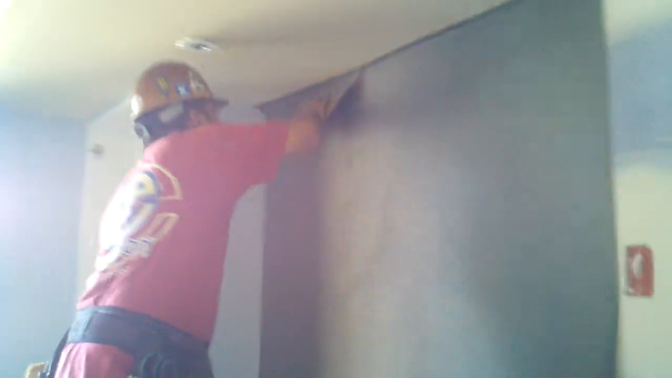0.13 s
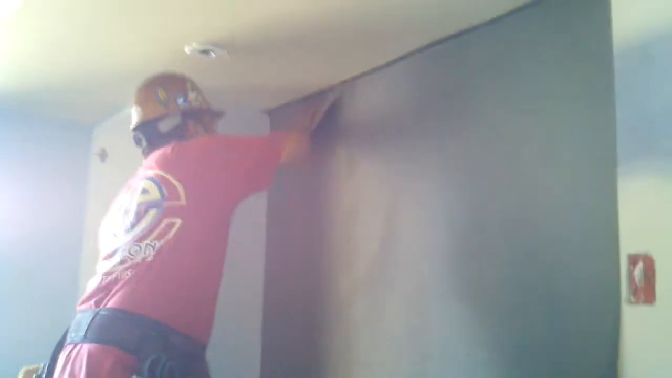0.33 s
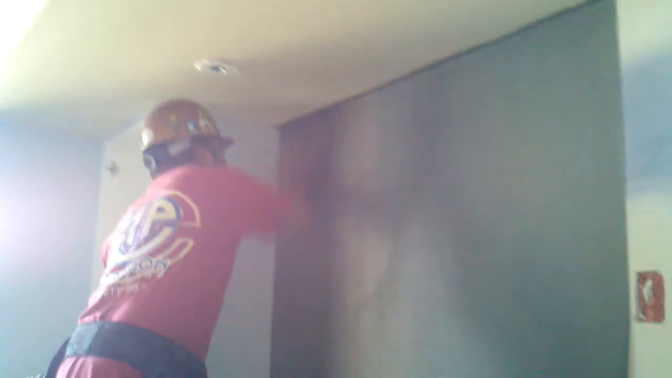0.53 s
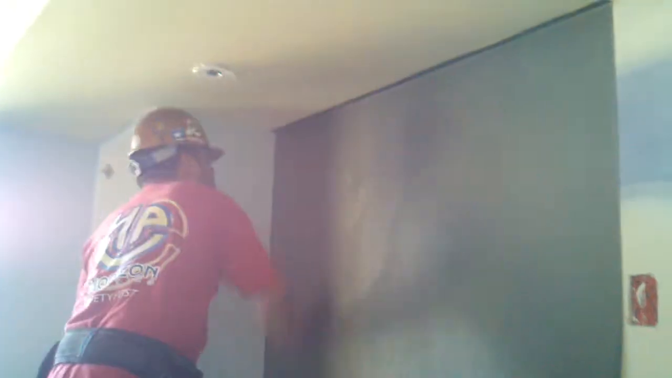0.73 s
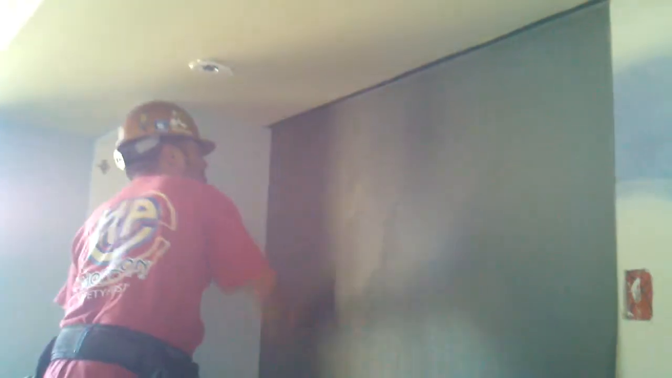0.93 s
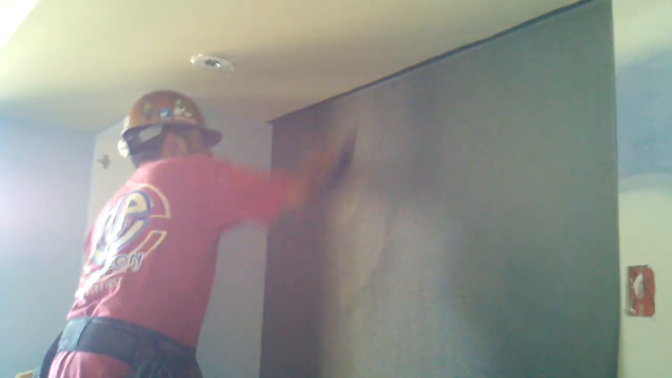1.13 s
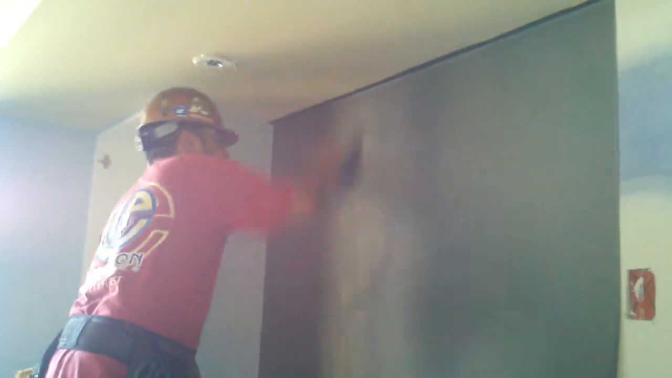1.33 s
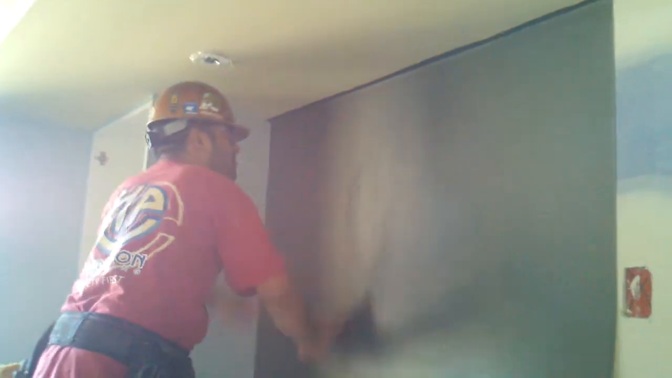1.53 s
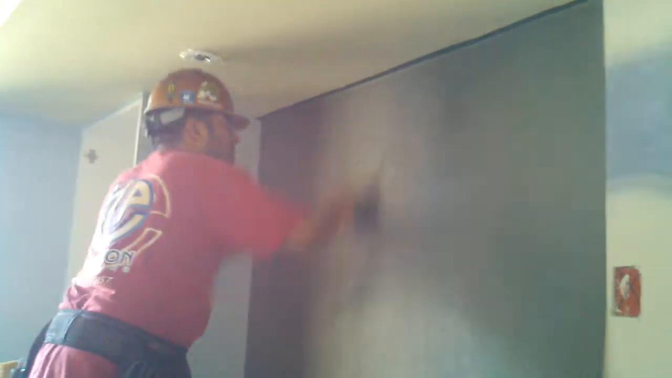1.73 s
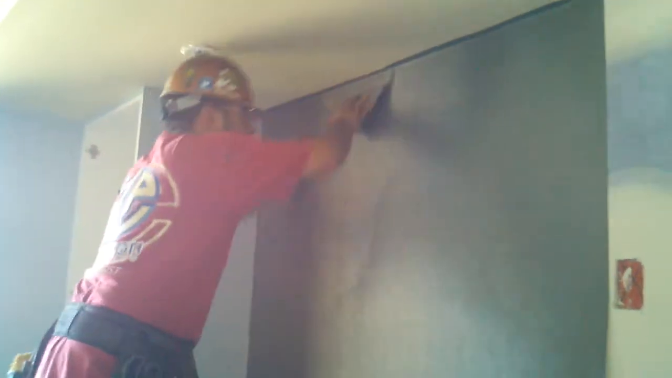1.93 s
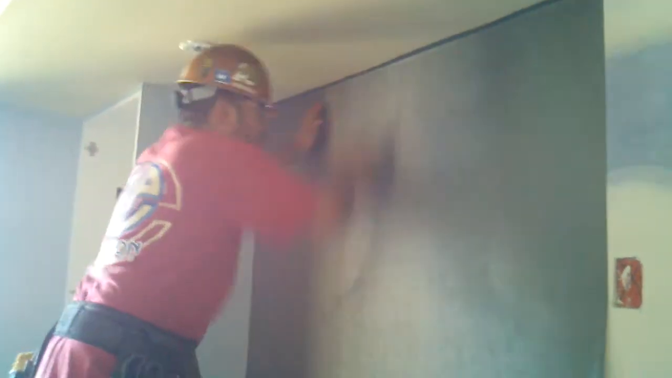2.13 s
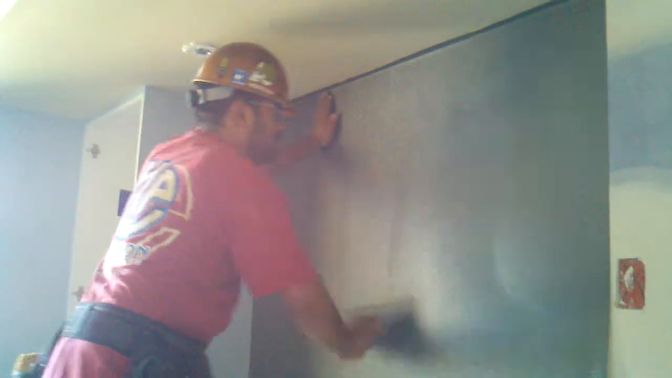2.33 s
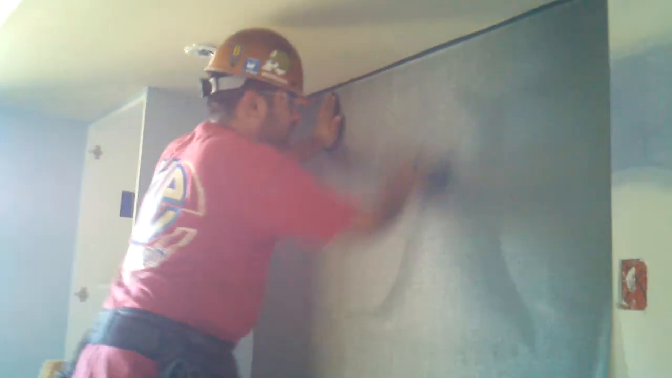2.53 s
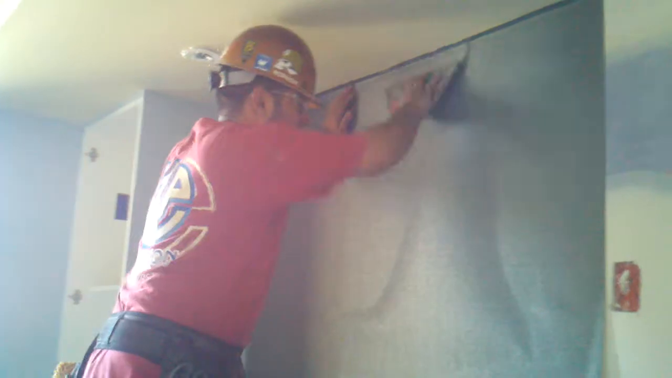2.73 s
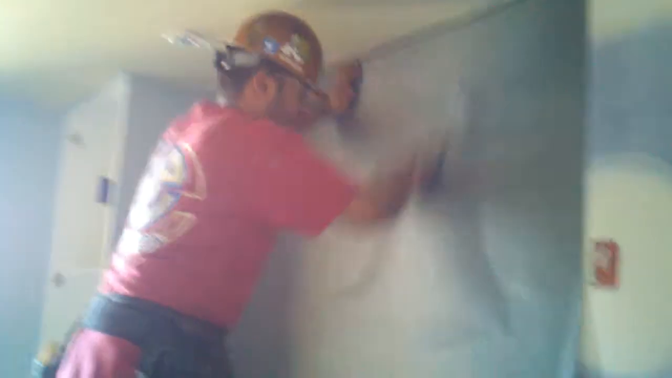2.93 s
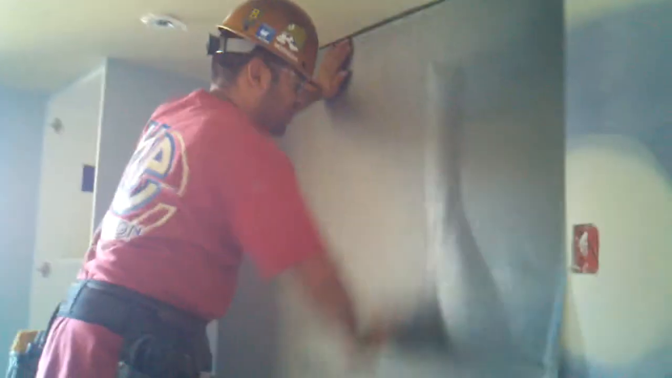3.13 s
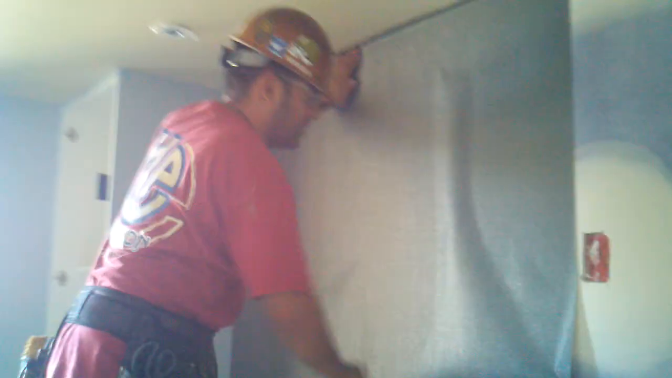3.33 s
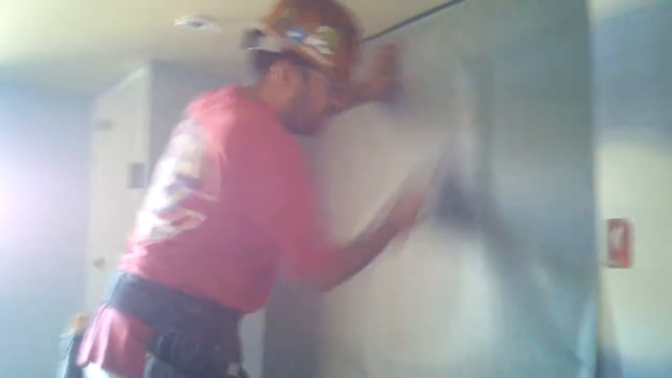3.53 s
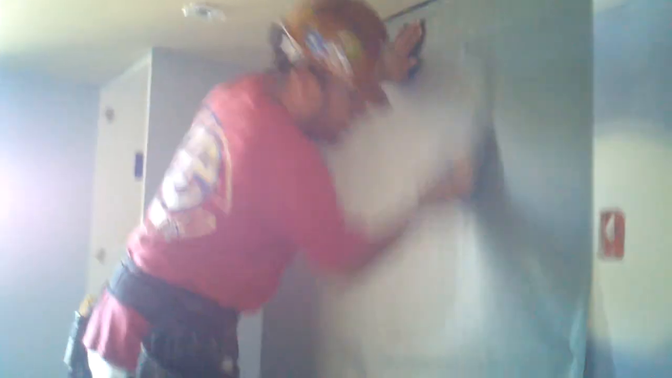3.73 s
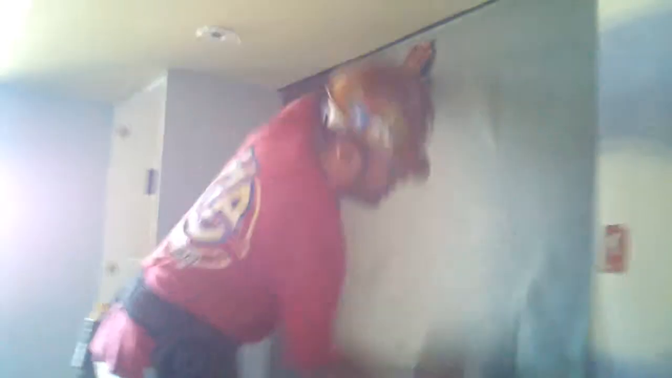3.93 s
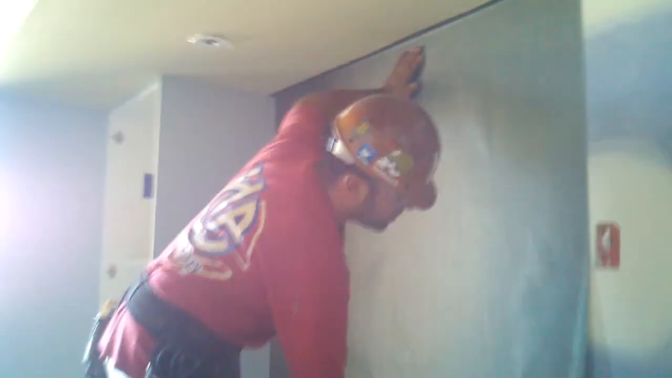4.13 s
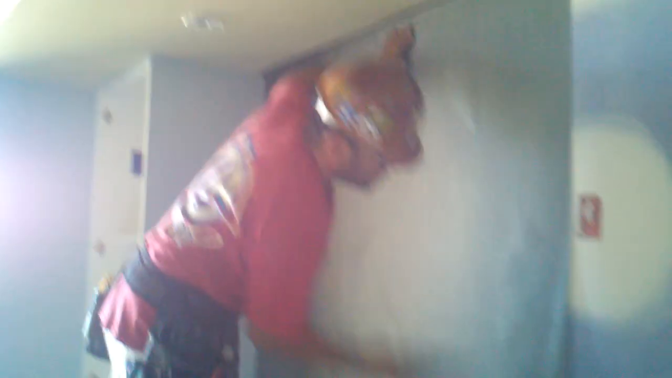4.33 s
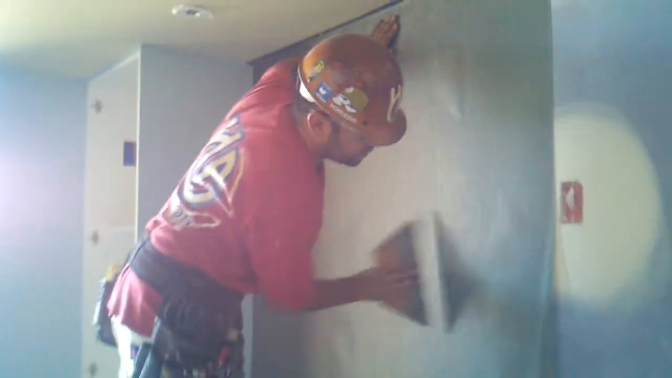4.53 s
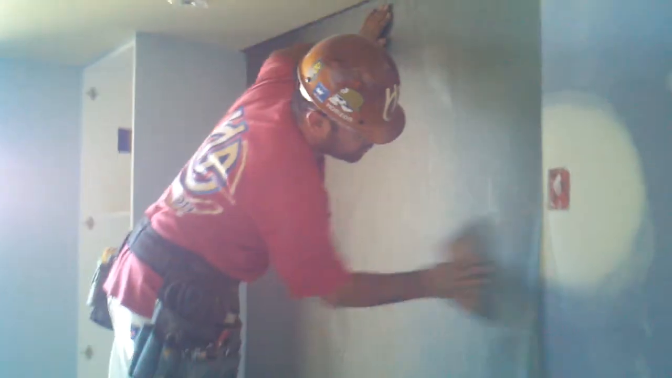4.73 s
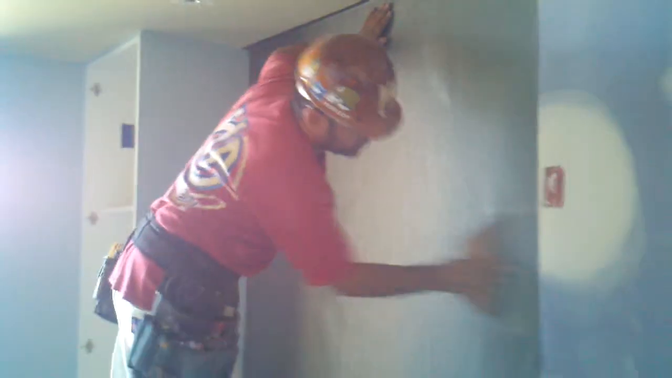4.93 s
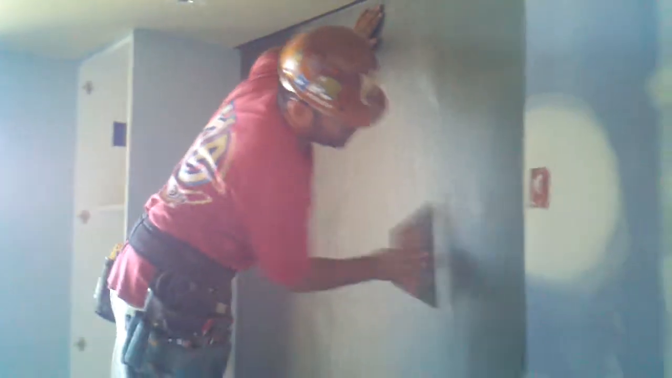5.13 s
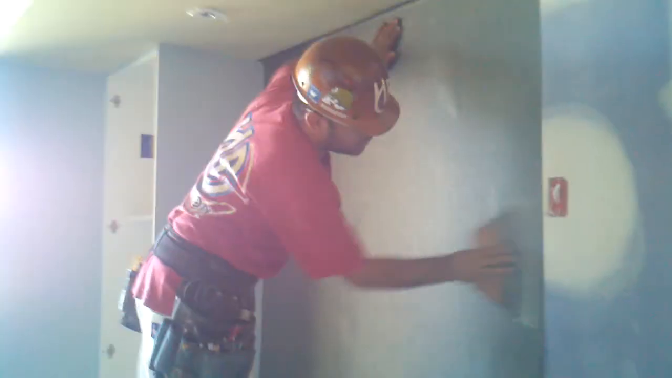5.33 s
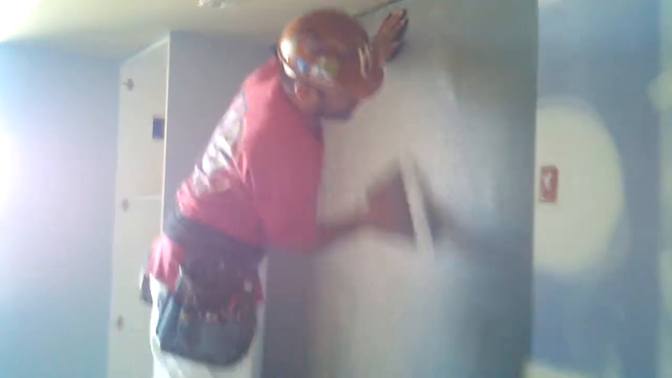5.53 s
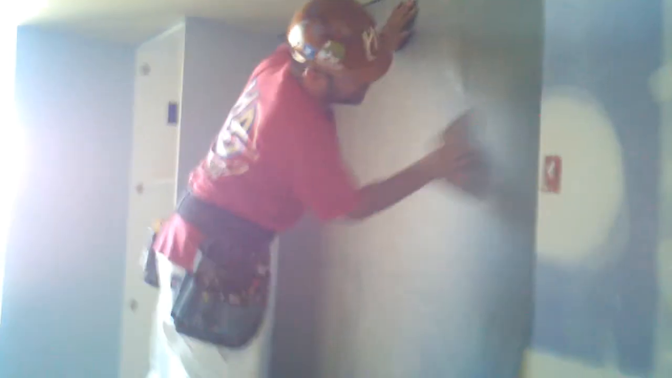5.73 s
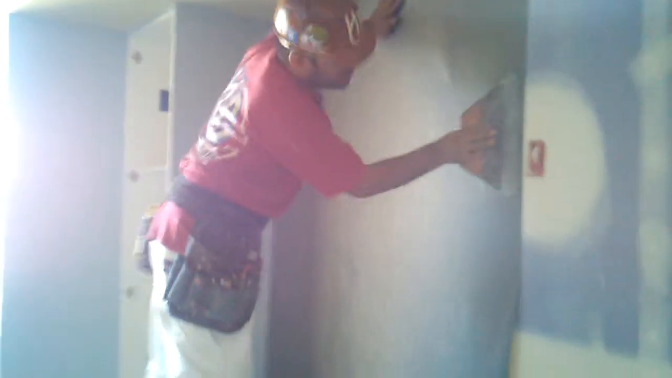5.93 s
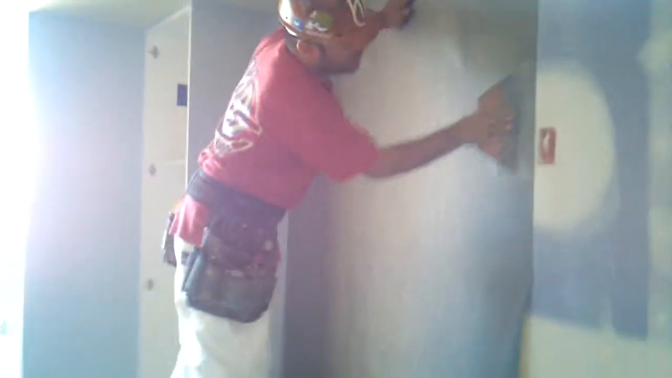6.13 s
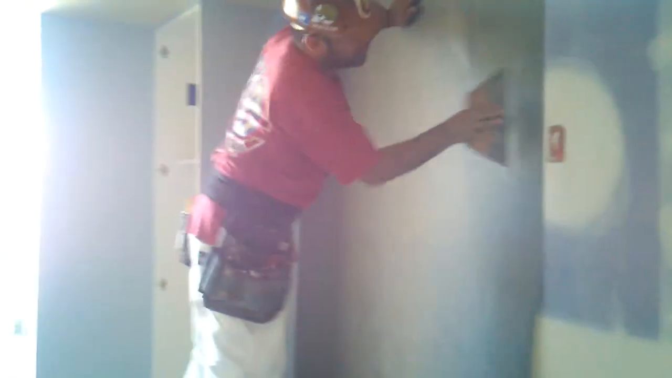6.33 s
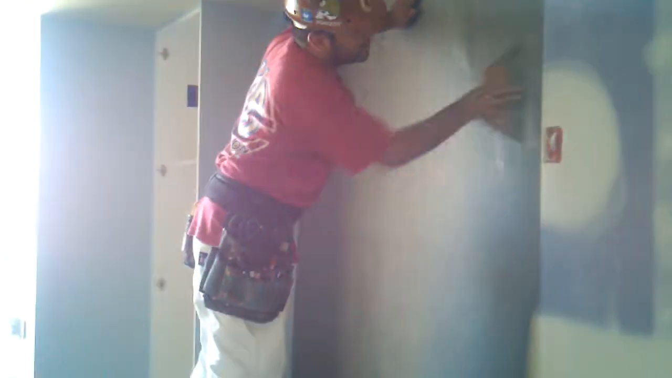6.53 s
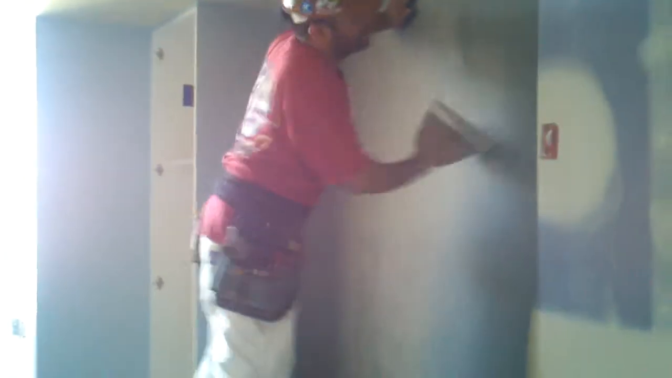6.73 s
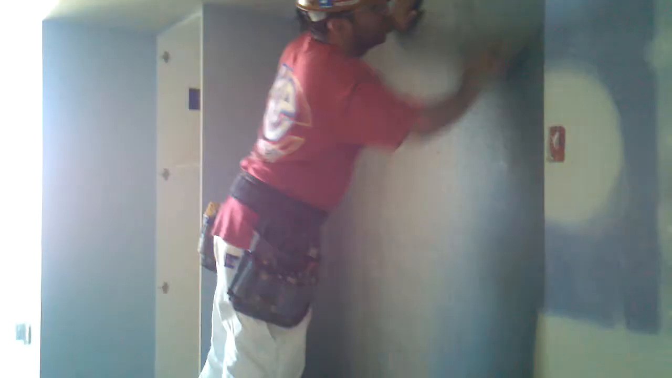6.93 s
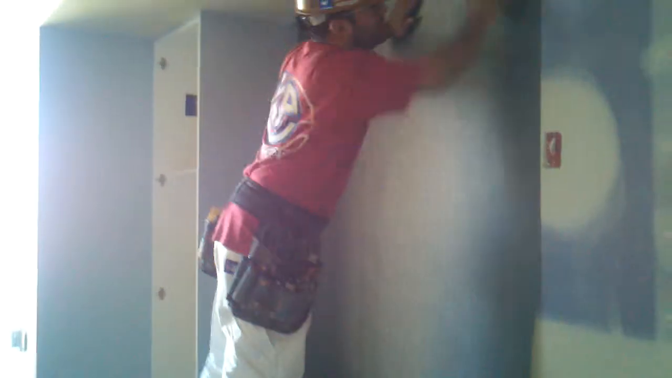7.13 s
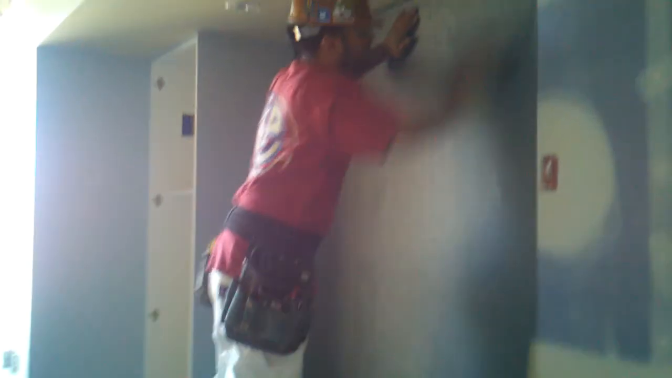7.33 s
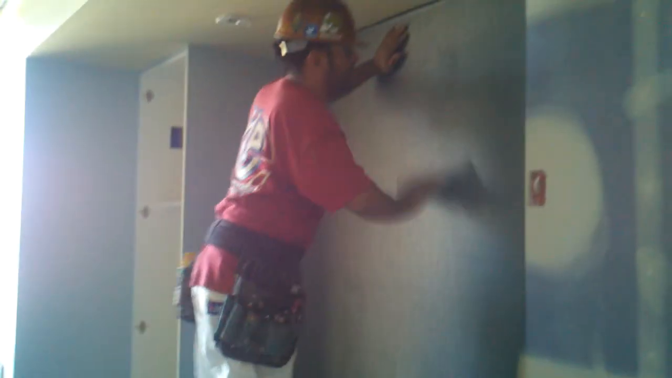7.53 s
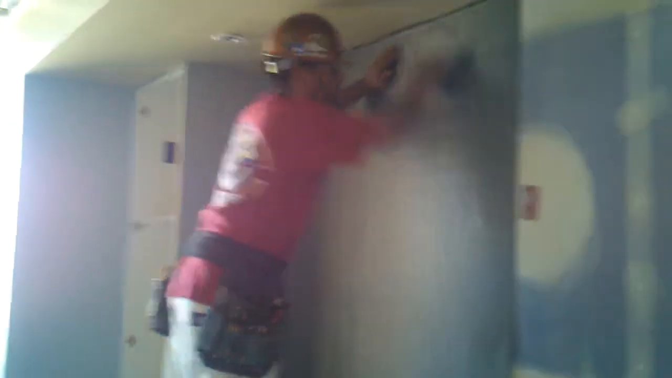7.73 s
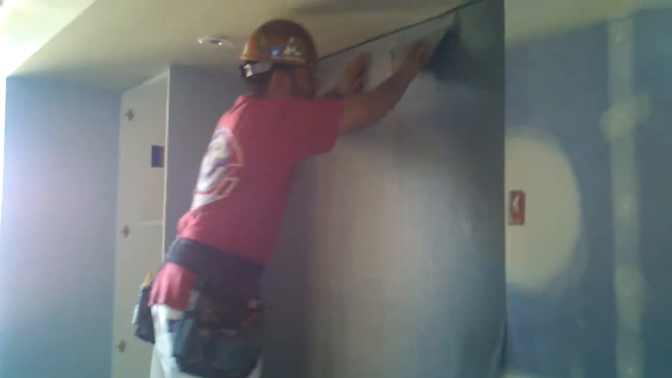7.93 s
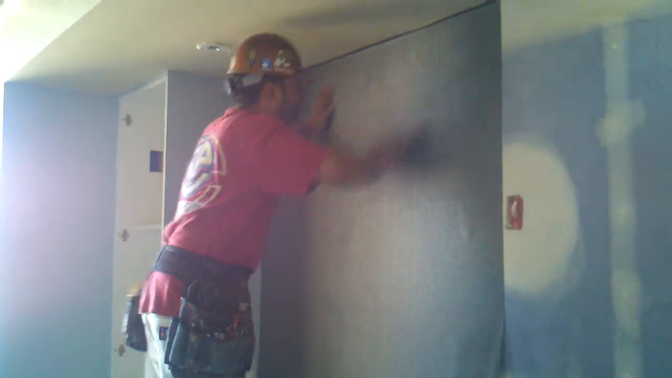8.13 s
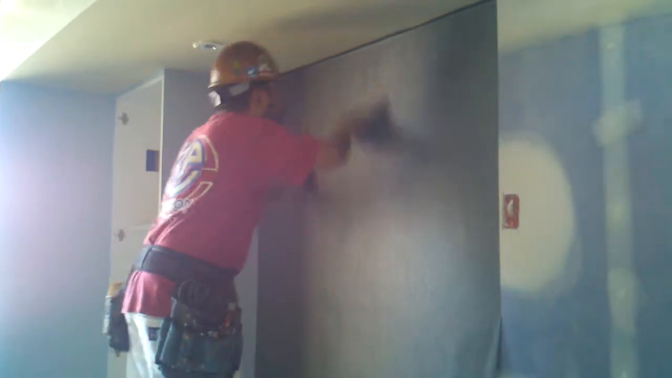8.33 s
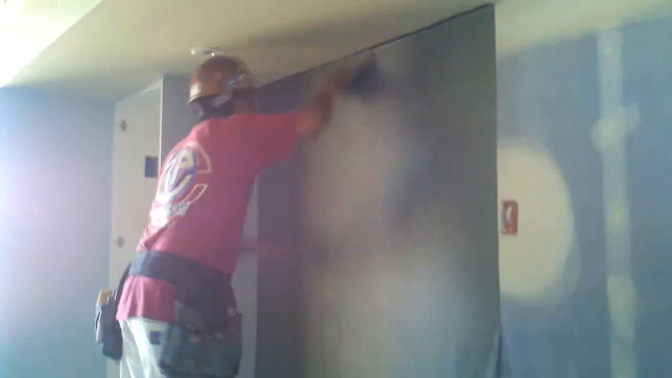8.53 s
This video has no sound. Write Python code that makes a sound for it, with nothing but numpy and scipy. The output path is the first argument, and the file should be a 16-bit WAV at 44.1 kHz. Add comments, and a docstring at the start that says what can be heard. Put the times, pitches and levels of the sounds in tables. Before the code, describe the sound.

In a bare indoor room with a short diffuse echo and faint steady air, a flat smoother works over embossed vinyl on a hollow wall, heard close and in wide stereo. A very faint rub opens; from 0.5 seconds brisk, gritty rasping strokes with sizzling hiss and low board rumble follow, several carrying fuzzy zips that glide in pitch, strongest near 1.1, 1.7, 2.1 and 2.4. A softer stroke at 2.8 leads to a sharp clack at 3.2, then a near pause. A light tap and a thud precede a swelling sweep from 3.7, zipping at 4.0. After another gap, taps near 4.6 start a weak rub. From 4.9 to 6.5 short scrapes crowd together with dull pushes on the board. Fuller, hissier sweeps follow from 6.5, the loudest around 7.2-7.4 with bright zips, another at 7.6, then darker rubs until the end at about 8.5.

```python
"""A smoother rasps and hisses in strokes over embossed vinyl wallcovering, in a bare room; the hollow wall rumbles.
Rasp and rumble are random stick-slip pulses over noise, hiss and sizzle are noise; each stroke swells with speed.
On fast sweeps the ridges zip: a fuzzy tone with an octave, its pitch following the hand's speed.
Shaped noise bursts make the soft pushes and the taps; early copies and a diffuse tail make the room.
The recorder widens the stereo by subtracting from each port a late copy of the other."""
import sys
import numpy as np
from scipy import signal
from scipy.fft import rfft, irfft, next_fast_len
from scipy.io import wavfile
from scipy.ndimage import uniform_filter1d, map_coordinates

SR = 44100
rng = np.random.default_rng(int(sys.argv[2]) if len(sys.argv) > 2 else 0)


def bounce(signal):
    """Save signal as a 16-bit WAV file at the path given by the first command-line argument."""
    frames = np.transpose(np.atleast_2d(signal))
    limited = np.clip(frames, -1, 1)
    pcm = np.round(limited * 32767).astype(np.int16)
    wavfile.write(sys.argv[1], SR, pcm)


N = 379083
TIME_S = np.arange(N) / SR


def amp(db):
    """Decibels to gain."""
    return 10 ** (np.asarray(db) / 20)


def unit(x):
    """Scaled to rms 1."""
    return x / np.sqrt(np.mean(x ** 2) + 1e-20)


def noise():
    """White noise of rms 1."""
    return rng.standard_normal(N)


def along(points, hz):
    """(Hz, value) points read on a log frequency axis."""
    point_hz, values = np.transpose(points)
    return np.interp(np.log(hz + 1), np.log(point_hz + 1), values)


def wobble(knots_per_s):
    """A smooth random curve of rms 1."""
    knots = rng.standard_normal(int(N * knots_per_s / SR) + 4)
    return unit(map_coordinates(knots, [TIME_S * knots_per_s]))


def filtered(x, response):
    """x times a response of frequency."""
    size = next_fast_len(N + SR // 2)
    spectrum = rfft(x, size) * response(np.fft.rfftfreq(size, 1 / SR))
    return irfft(spectrum, size)[..., :N]


def coloured(x, spectrum):
    """x given a spectrum, at rms 1."""
    return unit(filtered(x, lambda hz: amp(along(spectrum, hz))))


def slips(rate_per_s, spread_db, smooth):
    """Tiny stick-slip releases of uneven size at random moments, over smooth sliding noise."""
    sizes = amp(spread_db * np.clip(noise(), -2, 2)) * rng.choice([-1, 1], N)
    released = rng.random(N) < rate_per_s / SR
    return unit(sizes * released) + smooth * noise()


def patchy(x, depth_db):
    """The contact shifts along the edge, so patches of the spectrum swell and fade."""
    z = signal.stft(x, nperseg=512)[2]
    across_hz = uniform_filter1d(rng.standard_normal(z.shape), size=3, axis=0)
    field = uniform_filter1d(across_hz, size=7, axis=1)
    return unit(signal.istft(z * amp(depth_db * unit(field)), nperseg=512)[1][:N])


# smoother strokes; lean = pressure growth start to end, sizzle is relative to hiss, levels before layer trims:
# start_s, length_s, fastest_share (of length), lean_db, rasp_db, hiss_db, rumble_db, sizzle_db
STROKES = [(-0.027, 0.77, 0.031, -5, -51.5, -54, -52, 7.0), (0.496, 0.47, 0.36, -6.5, -27, -36.5, -42, 8.5),
           (0.899, 0.28, 0.6, -12.5, -26, -31.5, -46.5, 7.5), (1.273, 0.32, 0.59, -7.5, -28, -36.5, -47, 9),
           (1.597, 0.24, 0.51, -6, -28, -31, -52.5, 4.5), (1.845, 0.13, 0.45, -7, -31, -56, -49, 11),
           (2.03, 0.33, 0.62, -3.5, -27.5, -32.5, -53, 3.5),
           (2.38, 0.36, 0.056, -13, -32.5, -34.5, -54.5, 3), (2.674, 0.062, 0.39, -10, -34.5, -38, -60, -5),
           (2.799, 0.42, 0.56, -13, -31.5, -39, -53.5, 7), (3.073, 0.16, 1, -4, -32.5, -27.0, -45.5, -1.5),
           (3.67, 0.42, 0.99, -4.5, -28.5, -29, -49.5, 1), (4.598, 0.31, 0.68, -21, -35.5, -42, -48, 8),
           (4.922, 0.18, 0.6, 1, -29, -39.5, -47, 3), (5.127, 0.17, 0.65, -8, -31.0, -39, -49.5, 5),
           (5.342, 0.23, 0.54, 0, -27.0, -31.5, -49, -2), (5.575, 0.39, 0.32, -13.5, -36, -36, -51, -12),
           (5.943, 0.13, 0.34, -2, -33.5, -43, -45.5, 0.5),
           (6.076, 0.15, 0.49, -3, -33.5, -39.5, -45.5, -1),
           (6.234, 0.11, 0.62, 1.5, -28.5, -37.0, -42, -5), (6.378, 0.14, 0.52, 8.5, -34, -38.5, -46.5, -6),
           (6.543, 0.23, 0.51, 2, -26, -28, -44.5, -7), (6.766, 0.37, 0.33, 3.5, -27.5, -30, -45.5, -1),
           (7.187, 0.26, 0.66, -1, -23, -25.5, -44.5, -5.5),
           (7.501, 0.22, 0.45, -12, -28.5, -30, -52.0, -30),
           (7.735, 0.118, 0.31, -2, -36.5, -43.0, -48, -15.0),
           (7.944, 0.25, 0.62, -11, -27, -37.0, -53.5, -33.5), (8.192, 0.32, 0.36, 1, -29.5, -39.5, -46, 0)]
ATTACK_S, HISS_ATTACK_S, RELEASE_S = 0.027, 0.044, 0.04  # the edge bites low first, brightens as it lies flat
SPEED_ARCH = 1.4  # 1 = even speeding up and slowing, more = lingers near top speed
RASP_SWELL_DB, HISS_SWELL_DB, RUMBLE_SWELL_DB = 6, 15.5, -2  # standstill to top speed


def stroke_gain(levels_db, swell_db, attack_s):
    """Attack, a swell with the hand's speed under a tilting pressure, release; strokes add in power."""
    gain = np.zeros(N)
    for (start_s, length_s, fastest_share, lean_db, *_), level_db in zip(STROKES, levels_db):
        during = slice(*np.searchsorted(TIME_S, [start_s, start_s + length_s + RELEASE_S]))
        age_s = TIME_S[during] - start_s
        progress = np.minimum(age_s / length_s, 1)
        peak = np.clip(fastest_share, .02, .98)
        speed = 1 - np.interp(progress, [0, peak, 1], [1, 0, 1]) ** SPEED_ARCH
        ramp = np.minimum(age_s / attack_s, 1 + (length_s - age_s) / RELEASE_S)
        contact = np.sin(np.pi / 2 * np.clip(ramp, 0, 1)) ** 2
        own = contact * amp(level_db + lean_db * (progress - .5) + swell_db * (speed - 1))
        gain[during] = np.hypot(gain[during], own)
    return gain


# blade's broad resonances: freq_hz, density_db (per Hz)
RASP_SPECTRUM = [(200, -31), (480, -25), (680, -7), (770, -3.5), (860, 1.5), (1010, -4.5), (1130, -1.5),
                 (1390, -4), (1730, 1.5), (2100, -6.5), (2700, -9.5), (4000, -20.5), (8000, -46)]
# fine grit under the edge: freq_hz, density_db (per Hz)
HISS_SPECTRUM = [(900, -20.5), (1900, 14), (2800, 5), (3700, 0.5), (4600, -1), (5300, -6.5), (6500, -10.5),
                 (9000, -14.5), (14000, -21.5)]
# bright sizzle of a steeper blade: freq_hz, density_db (per Hz)
SIZZLE_SPECTRUM = [(2000, -32), (4000, -4), (6000, 4), (8000, -1.5), (11000, -5.5), (14000, -9)]


def rubbing():
    """The edge drags over the vinyl; its chatter shakes rasp, hiss and sizzle together."""
    *_, rasp_db, hiss_db, _, sizzle_db = np.transpose(STROKES)
    chatter = wobble(110)
    grains = slips(rate_per_s=1500, spread_db=3.0, smooth=0.14) * amp(2 * chatter)
    rasp = patchy(coloured(grains, RASP_SPECTRUM), depth_db=3.5)
    rasp = stroke_gain(rasp_db, RASP_SWELL_DB, ATTACK_S) * rasp
    # the finest grit is too dense to be heard as single slips
    hiss = patchy(coloured(noise(), HISS_SPECTRUM), depth_db=2.0)
    hiss = stroke_gain(hiss_db, HISS_SWELL_DB, HISS_ATTACK_S) * hiss
    sizzle = coloured(noise(), SIZZLE_SPECTRUM)
    sizzle = stroke_gain(hiss_db + sizzle_db, HISS_SWELL_DB, HISS_ATTACK_S) * sizzle
    return amp(1.5) * rasp + amp(1.6 * chatter) * (amp(6) * hiss + amp(-7.5) * sizzle)


# hollow wall: freq_hz, density_db (per Hz)
WALL_SPECTRUM = [(30, -28), (70, -26), (135, -2.5), (190, -14.5), (270, -0.5), (355, 1.5), (450, 0),
                 (700, 3), (1500, -34)]


def rumble():
    """The board wall drones under the sliding pressure."""
    *_, rumble_db, _ = np.transpose(STROKES)
    drone = coloured(slips(rate_per_s=600, spread_db=5.5, smooth=0.37), WALL_SPECTRUM)
    return amp(-2.5) * stroke_gain(rumble_db, RUMBLE_SWELL_DB, ATTACK_S) * drone


def ridge_tone(phase, ridges):
    """The edge keeps in step with the embossing for a few ridges only: a fuzzy line around the ridge rate."""
    travel = phase / (2 * np.pi * ridges)
    cos_knots, sin_knots = rng.standard_normal((2, N // 8))
    cos_part = map_coordinates(cos_knots, [travel], mode="wrap")
    sin_part = map_coordinates(sin_knots, [travel], mode="wrap")
    return cos_part * np.cos(phase) + sin_part * np.sin(phase)


# edge catching the ridges, level before layer trim:
# loudest_s, ridge_hz (at loudest_s), glide_hz_per_s, rise_s, fall_s, level_db
ZIPS = [(0.555, 936, 5000.0, 0.03, 0.052, -22.5), (0.78, 1864, 491, 0.087, 0.06, -24.5),
        (1.09, 2031, -10000.0, 0.07, 0.03, -15), (1.548, 1570, -10000.0, 0.022, 0.01, -22.5),
        (1.735, 2077, -9000.0, 0.035, 0.039, -11), (2.128, 1813, 7198.5, 0.021, 0.1, -14),
        (2.419, 1733, 10000.0, 0.012, 0.019, -10.5), (3.226, 1980.0, 2500.5, 0.008, 0.009, -17),
        (3.931, 1750.0, 614, 0.09, 0.094, -26), (4.017, 1840, 800.0, 0.038, 0.026, -10.5),
        (6.685, 1550.0, 781, 0.031, 0.03, -20), (6.816, 1676, 600.0, 0.017, 0.036, -19.5),
        (6.971, 1559, -1500.0, 0.0528, 0.065, -25), (7.302, 1803, 14009, 0.041, 0.015, -14.5),
        (7.42, 1915, -14000.0, 0.021, 0.023, -11), (7.622, 1849, -2500.0, 0.036, 0.05, -13.0),
        (7.775, 964, -5000.0, 0.052, 0.029, -27), (8.001, 998, 11000.0, 0.026, 0.036, -27.5),
        (8.095, 1624, 1198, 0.068, 0.033, -23.5)]
SLOWING_HZ_PER_S2 = 28000  # the hand's speed is an arch, so every glide bends downwards
SLOWEST_HZ = 607.3  # floor of the glide, before jitter
ZIP_ROUNDNESS = 1.5  # 1 = pointed swell, 2 = bell


def zipping():
    """The embossed ridges sing higher the faster the hand moves; the strongest zip sets the pitch."""
    rate_hz, gain = np.zeros(N), np.zeros(N)
    for loudest_s, ridge_hz, glide_hz_per_s, rise_s, fall_s, level_db in ZIPS:
        age_s = TIME_S - loudest_s
        distance = np.minimum(abs(age_s) / np.where(age_s < 0, rise_s, fall_s), 20)
        own = amp(level_db) * np.exp(-distance ** ZIP_ROUNDNESS)
        glide_hz = ridge_hz + glide_hz_per_s * age_s - SLOWING_HZ_PER_S2 * age_s ** 2
        rate_hz = np.where(own >= gain, np.maximum(glide_hz, SLOWEST_HZ), rate_hz)
        gain = np.maximum(gain, own)
    phase = 2 * np.pi * np.cumsum(rate_hz * (1 + .022 * wobble(170))) / SR
    core = unit(np.sin(phase) * amp(2.3 * wobble(240)))
    fuzz = amp(-3) * ridge_tone(phase, ridges=4)
    octave = amp(-14.5) * ridge_tone(2 * phase, ridges=8)
    return amp(0.5) * gain * unit(core + fuzz + octave)


# hand leaning into the hollow wall, level before layer trim: start_s, level_db
BUMPS = [(2.71, -48), (5.195, -43), (5.424, -38.5), (5.775, -45), (7.111, -43)]
# wall's dull answer to a soft push: freq_hz, density_db (per Hz)
PUSH_SPECTRUM = [(30, -16), (70, -4), (150, -1), (220, 4), (300, 4), (450, 3.5), (800, 6.5), (1500, -76)]


def bumps():
    """Soft pushes flex the board: a dull swell that dies quickly."""
    push = np.zeros(N)
    for start_s, level_db in BUMPS:
        age_s = np.maximum(TIME_S - start_s, 0)
        push += (1 - np.exp(-age_s / 0.0049)) * amp(level_db - 60 * age_s / 0.26)
    return amp(12) * push * coloured(noise(), PUSH_SPECTRUM)


# smoother landing on the wall or flicking off it, levels before layer trims: start_s, clack_db, thud_db, snap_db
TAPS = [(3.218, -14, -60, -23), (3.499, -39, -46, -39.5), (3.655, -18, -30.5, -56), (4.54, -39, -43.5, -60),
        (4.584, -20, -28, -46)]
CLACK_T60_S, THUD_T60_S, SNAP_T60_S, THUD_RISE_S = 0.032, .13, 0.041, .002


def taps():
    """Each tap is a snap of the edge, a short plastic clack and a duller thud of the wall."""
    clack, thud, snap = np.zeros(N), np.zeros(N), np.zeros(N)
    for start_s, clack_db, thud_db, snap_db in TAPS:
        age_s = np.maximum(TIME_S - start_s, 0)
        clack += (age_s > 0) * amp(clack_db - 60 * age_s / CLACK_T60_S)
        thud += (1 - np.exp(-age_s / THUD_RISE_S)) * amp(thud_db - 60 * age_s / THUD_T60_S)
        snap += (age_s > 0) * amp(snap_db - 60 * age_s / SNAP_T60_S)
    blade = amp(-4.0) * clack * coloured(noise(), RASP_SPECTRUM)
    edge = amp(7.0) * snap * coloured(noise(), HISS_SPECTRUM)
    wall = amp(-2.5) * thud * coloured(noise(), WALL_SPECTRUM)
    return blade + edge + wall


# still air of the building: freq_hz, density_db (per Hz)
AIR_SPECTRUM = [(25, -4), (70, -23), (130, -12), (300, -8), (600, -23.5), (2000, -14), (5000, -39),
                (14000, -35.5)]


def still_air():
    """Steady coloured noise, independent in sum and difference."""
    return amp(-53.5) * coloured(rng.standard_normal((2, N)), AIR_SPECTRUM)


def arrival(x, lead_samples):
    """Sum and difference of a sound reaching the left port a little sooner (lead before the width filter)."""
    return np.array([x, lead_samples * np.gradient(x)])


MOVE_S = .15  # time in which the hand moves far enough to change the first reflections


def early_walls(x, count):
    """Ceiling, floor and corner return weak copies within 25 ms; the pattern changes as the hand travels."""
    returned = np.zeros((2, N + SR))
    for centre_s in np.arange(0, TIME_S[-1] + MOVE_S, MOVE_S):
        first, last = np.searchsorted(TIME_S, [centre_s - MOVE_S, centre_s + MOVE_S])
        piece = x[first:last] * np.cos(np.pi / 2 * (TIME_S[first:last] - centre_s) / MOVE_S)
        copies = np.zeros((2, SR // 40))
        for row in copies:
            delays = rng.integers(SR // 400, SR // 40, count)
            row[delays] = rng.choice([-1, 1], count) / np.sqrt(count)
        answer = signal.fftconvolve(piece[None], copies, axes=1)
        returned[:, first:first + answer.shape[1]] += answer
    return returned[:, :N]


# bare room's decay: freq_hz, t60_s
ROOM_DECAY = [(120, 0.77), (500, 0.45), (1700, 0.5), (4000, 0.62), (8000, 0.58), (14000, 0.51)]


def room(x):
    """The bare room stores each frequency's energy and returns it diffusely, as sum and difference."""
    size, hop = 512, 128
    hz, _, z = signal.stft(x, SR, nperseg=size, noverlap=size - hop)
    kept = amp(-60 * hop / SR / along(ROOM_DECAY, hz)) ** 2  # energy share per hop
    # energy returns two hops after the direct sound
    stored = np.array([signal.lfilter([0, 0, 1 - k], [1, -k], abs(row) ** 2) for k, row in zip(kept, z)])
    diffuse = signal.stft(rng.standard_normal((2, N)), nperseg=size, noverlap=size - hop)[2]
    tail = diffuse / np.std(diffuse) * np.sqrt(stored)
    return signal.istft(tail, nperseg=size, noverlap=size - hop)[1][:, :N]


# wallboard's narrow resonances, level against the plain sound: centre_hz, width_hz, level_db
BOARD = [(351.4, 26, -1), (840, 117, -8.5)]


def board(hz):
    """The wallboard's narrow resonances ring on top of the plain sound."""
    response = 1
    for centre_hz, width_hz, level_db in BOARD:
        damping = 1j * hz * width_hz
        response = response + amp(level_db) * damping / (centre_hz ** 2 - hz ** 2 + damping)
    return response


# gain on the difference between the two ports: freq_hz, gain_db
WIDTH = [(60, 3), (150, -17.5), (350, -11.5), (700, -6), (1000, -2.5), (1900, 2), (3300, -1.5), (5000, 1),
         (14000, 0)]


def scene():
    """The work and the still air at two closely spaced ports; the zip beams towards the recorder."""
    work = rubbing() + rumble() + bumps() + taps()
    zips = zipping()
    direct = amp(-2.0) * arrival(work, lead_samples=0.95) + amp(-1.5) * arrival(zips, lead_samples=1.8)
    early = amp(-8) * early_walls(work, count=8)
    echo = room(amp(-2.0) * work + amp(-5) * zips)
    mid, difference = filtered(direct + early + echo, board) + still_air()
    side = filtered(difference, lambda hz: amp(along(WIDTH, hz)))
    return amp([[-.25], [.25]]) * np.array([mid + side, mid - side])


# share of the other port that is subtracted: freq_hz, share
CROSSFEED = [(4050, .995), (5000, .32), (8000, .22), (14000, .25)]
CROSS_DELAY_S, TOP_HZ = 1 / 2605, 13980


def record(dry):
    """Delayed crossfeed widens the pair, an equaliser restores the overall balance, and the band ends steeply."""
    def cross(hz):
        """Share of the other port, delayed."""
        return np.clip(along(CROSSFEED, hz), 0, .995) * np.exp(-2j * np.pi * hz * CROSS_DELAY_S)

    def balance(hz):
        """Inverse of the crossfeed's effect on sum and difference together, cut at the top."""
        mid_gain = abs(1 - cross(hz))
        side_gain = amp(along(WIDTH, hz)) * abs(1 + cross(hz))
        return (hz < TOP_HZ) / np.hypot(mid_gain, side_gain)

    wide = dry - filtered(dry[::-1], cross)
    return filtered(wide, balance)


dry = scene()
out = record(dry)
bounce(out)
```